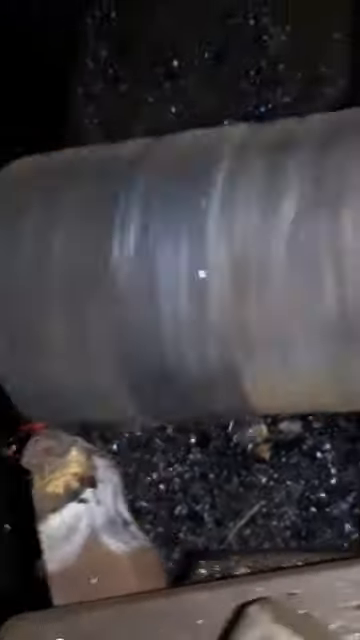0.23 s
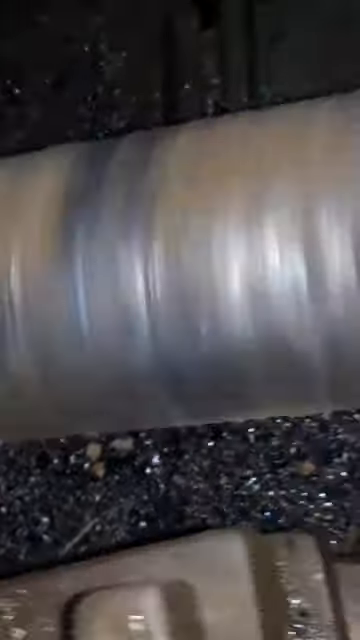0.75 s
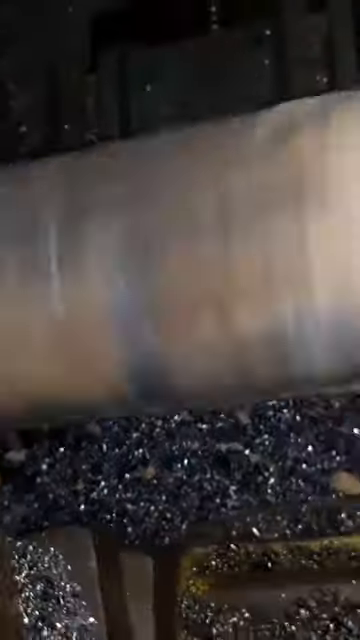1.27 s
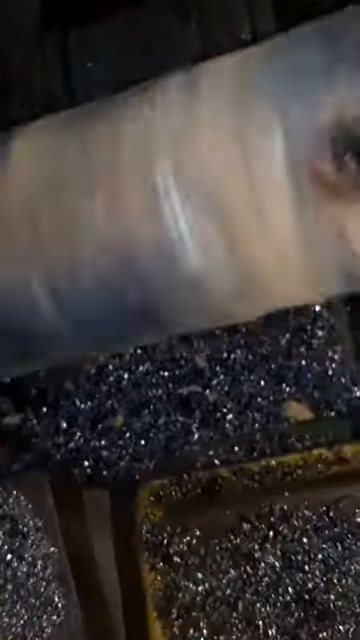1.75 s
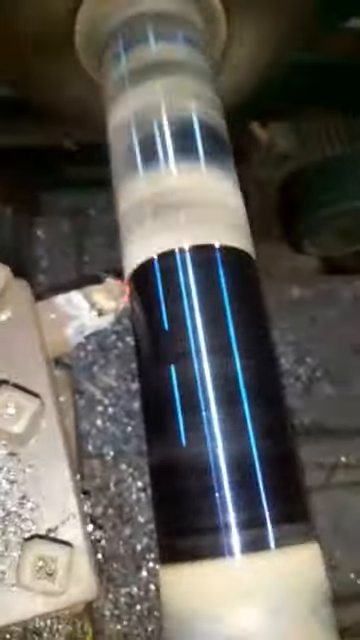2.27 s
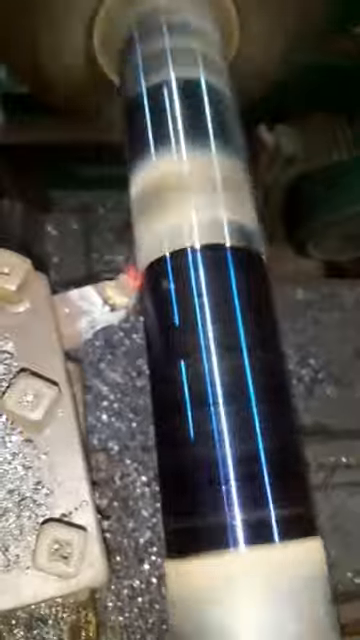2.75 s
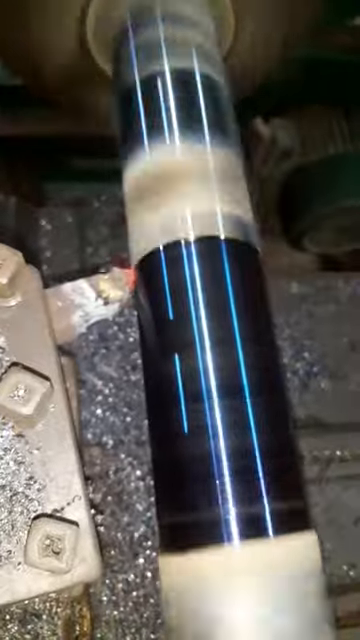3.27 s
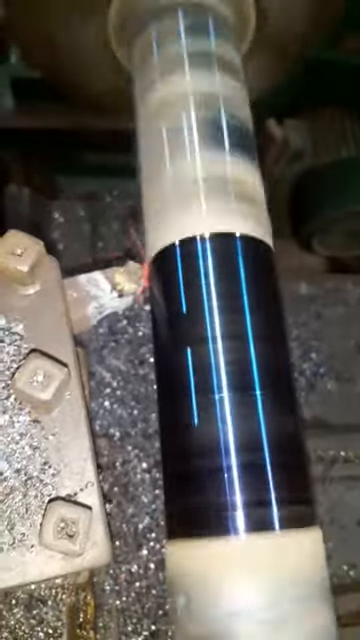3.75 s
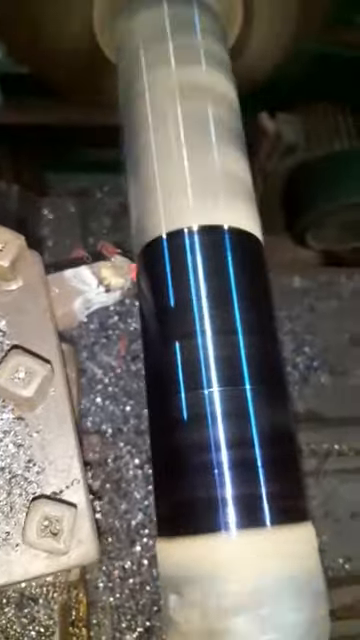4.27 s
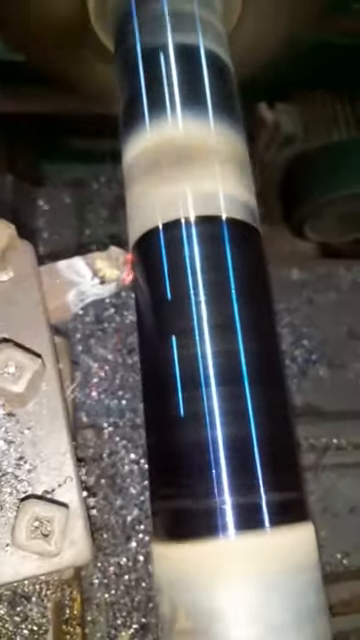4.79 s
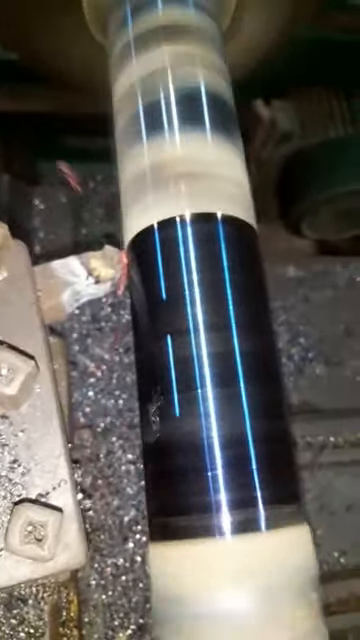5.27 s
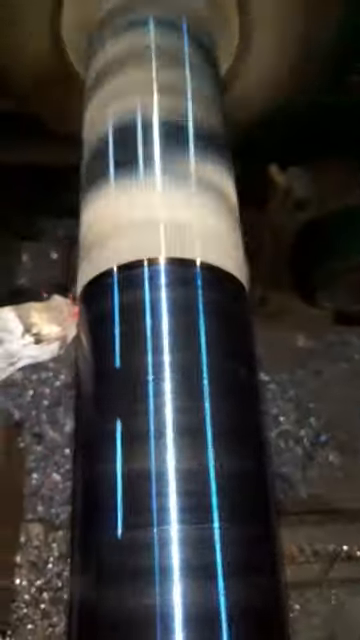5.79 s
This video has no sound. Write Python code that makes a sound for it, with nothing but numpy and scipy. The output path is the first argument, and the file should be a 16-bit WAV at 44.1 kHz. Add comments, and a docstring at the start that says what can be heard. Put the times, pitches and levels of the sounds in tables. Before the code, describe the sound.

A metal lathe rumbles and whirrs while its tool bites into steel, making a piercing, fluttering squeal close to the microphone, mostly on the right. The squeal eases, flares up and stops dead for a moment. It returns over a humming motor and builds to harder, slightly lower squeaks. Throughout, the metal being cut off rasps, hisses and ticks, with very little workshop echo.

```python
"""A lathe cutting steel

Friction makes the tool ring, and it bites into the turning shaft in short, lower squeaks. The chip (the
strip of metal being cut off) crackles, rasps, hisses and snaps. Gears and bearings rumble. An automatic
volume control dips after loud squeaks. The sound pauses, then fades in at a spot where the motor hums."""
import sys
import numpy as np
from scipy import signal
from scipy.fft import rfft, irfft, next_fast_len
from scipy.io import wavfile

SR = 44100
rng = np.random.default_rng(int(sys.argv[2]) if len(sys.argv) > 2 else 0)


def unload_audio(sound):
    """Save the sound as a 16-bit wav file, at the path given as the first command line argument."""
    columns = np.transpose(np.atleast_2d(sound))
    # keep every value between -1 and 1, then stretch to whole-number steps
    steps = np.round(np.clip(columns, -1, 1) * 32767)
    wavfile.write(sys.argv[1], SR, steps.astype(np.int16))


N = 265923
TIME_S = np.arange(N) / SR
PAUSE_S, RESUME_S, FADE_S = 1.926, 2.1003, 0.11

# The tool's hardest bites: time_s, peak_db, half_length_s, pitch_hz, crackle_db
BITES = [(0.0113, -10.5, 0.0031, 2826, -48), (0.022, -14, 0.003, 2830, -46), (0.03, -14, 0.0024, 2800, -47),
         (0.047, -6, 0.0016, 2827, -38), (0.062, -4.5, 0.0048, 2783, -34),
         (0.0875, -9.5, 0.0082, 2830, -40), (0.107, -12, 0.0031, 2813, -42),
         (0.123, -8.5, 0.0084, 2820, -42), (0.137, -9, 0.0014, 2842, -42), (0.157, -21, 0.0041, 2813, -42),
         (0.194, -9.5, 0.0024, 2817, -40), (0.206, -5, 0.0064, 2794, -36), (0.229, -7, 0.0062, 2805, -45),
         (0.2784, -2.5, 0.0052, 2758, -37), (0.3028, -8, 0.0035, 2796, -39), (0.316, -5, 0.0023, 2800, -41),
         (0.3533, -3, 0.0038, 2775, -37), (0.368, -7, 0.0032, 2824, -42), (0.3834, -6.5, 0.0025, 2822, -38),
         (0.395, -9, 0.0016, 2800, -39), (0.4114, -10.5, 0.0072, 2830, -40),
         (0.429, -12, 0.0022, 2841, -37), (0.441, -13, 0.0037, 2831, -37), (0.4583, -14, 0.003, 2816, -45),
         (0.4846, -8.5, 0.0073, 2800, -40), (0.4997, -5.5, 0.0042, 2764, -44),
         (0.523, -11, 0.0048, 2809, -48), (0.567, -5, 0.0057, 2785, -44), (0.597, -10.5, 0.0046, 2808, -51),
         (0.63, -11.5, 0.0051, 2819, -47), (0.644, -6, 0.0041, 2781, -46), (0.666, -28, 0.002, 2852, -40),
         (0.676, -14, 0.0026, 2791, -44), (0.707, -12.5, 0.0058, 2821, -38), (0.728, -18, 0.004, 2846, -33),
         (0.75, -21, 0.0035, 2806, -41), (0.781, -15, 0.003, 2831, -39), (0.859, -20.5, 0.0077, 2805, -40),
         (0.888, -18, 0.0054, 2837, -44), (0.923, -22, 0.0083, 2840, -41), (1, -27, 0.0043, 2842, -42),
         (1.081, -15.5, 0.0029, 2824, -38), (1.092, -21, 0.0032, 2818, -42),
         (1.1483, -14, 0.0085, 2805, -39), (1.171, -22, 0.0034, 2810, -37),
         (1.219, -6.5, 0.0031, 2773, -40), (1.234, -17.5, 0.0017, 2784, -37),
         (1.2465, -14.5, 0.0032, 2761, -42), (1.284, -18.5, 0.0022, 2825, -45),
         (1.297, -23.5, 0.0051, 2833, -42), (1.337, -26, 0.0047, 2861, -48),
         (1.415, -27, 0.0031, 2837, -48), (1.506, -25, 0.0024, 2832, -45), (1.55, -23, 0.0031, 2833, -39),
         (1.581, -6, 0.0024, 2812, -34), (1.606, -18, 0.0039, 2837, -42), (1.619, -13, 0.0022, 2800, -38),
         (1.628, -10, 0.0038, 2831, -45), (1.653, -2, 0.0043, 2747, -40), (1.69, -8, 0.002, 2786, -43),
         (1.719, -1.5, 0.0049, 2748, -40), (1.7355, -14, 0.0019, 2776, -45),
         (1.7522, -5.5, 0.0031, 2777, -42), (1.784, -9, 0.0036, 2772, -46),
         (1.795, -7.5, 0.0051, 2812, -44), (1.819, -5.5, 0.0023, 2786, -38),
         (1.841, -12.5, 0.0036, 2815, -42), (1.864, -9, 0.01, 2815, -39), (1.8974, -13, 0.01, 2815, -45),
         (2.271, -22, 0.0042, 2762, -46), (2.3274, -15, 0.0076, 2740, -44),
         (2.381, -17.0, 0.0066, 2747, -48), (2.397, -14, 0.0067, 2749, -46),
         (2.429, -22, 0.0042, 2729, -42), (2.451, -15.5, 0.005, 2730, -36),
         (2.4634, -14.5, 0.0076, 2728, -42), (2.533, -13.5, 0.0064, 2743, -42),
         (2.596, -13, 0.0054, 2709, -34), (2.6436, -13, 0.002, 2736, -42), (2.67, -16, 0.0046, 2752, -47),
         (2.7229, -13.5, 0.0035, 2766, -37), (2.754, -18, 0.0056, 2752, -37),
         (2.807, -17.0, 0.0052, 2765, -53), (2.8595, -13, 0.0039, 2754, -38),
         (2.979, -20, 0.0035, 2747, -34), (2.997, -9.5, 0.011, 2750, -33), (3.023, -16, 0.0045, 2782, -33),
         (3.056, -17, 0.0049, 2759, -42), (3.0775, -14.5, 0.0049, 2779, -42),
         (3.129, -17, 0.0057, 2755, -29), (3.16, -25, 0.0052, 2773, -42), (3.211, -27, 0.0052, 2769, -42),
         (3.256, -19.5, 0.0048, 2778, -40), (3.28, -22, 0.0041, 2754, -48), (3.336, -22, 0.0064, 2740, -48),
         (3.403, -23, 0.004, 2746, -45), (3.474, -21, 0.0052, 2758, -43), (3.503, -21.5, 0.006, 2754, -42),
         (3.53, -19, 0.0096, 2760, -35), (3.609, -14, 0.0054, 2751, -42), (3.635, -14.5, 0.0054, 2765, -42),
         (3.655, -17, 0.0027, 2773, -30), (3.672, -11, 0.0046, 2745, -38), (3.682, -12, 0.0045, 2745, -34),
         (3.73, -12.5, 0.01, 2750, -41), (3.749, -16, 0.0048, 2764, -44), (3.772, -14, 0.0088, 2755, -40),
         (3.815, -9.5, 0.0054, 2774, -30), (3.846, -8, 0.0052, 2746, -46), (3.864, -11, 0.0045, 2707, -44),
         (3.881, -10, 0.0051, 2748, -44), (3.943, -12.5, 0.0075, 2744, -32),
         (3.998, -7.5, 0.018, 2754, -44), (4.016, -6, 0.0033, 2760, -38), (4.062, -11, 0.0035, 2774, -25),
         (4.0954, -12, 0.005, 2744, -33), (4.122, -5, 0.0072, 2730, -47), (4.151, -7, 0.0079, 2740, -39),
         (4.203, -3.5, 0.0024, 2686, -22.5), (4.222, -8, 0.0074, 2690, -38), (4.235, -3, 0.0043, 2684, -27),
         (4.26, -6, 0.0048, 2697, -44), (4.289, -5, 0.0062, 2733, -29), (4.3405, 1.5, 0.0026, 2639, -23),
         (4.372, -4.5, 0.0053, 2730, -25), (4.4273, -8.5, 0.006, 2750, -36),
         (4.478, -12, 0.0032, 2676, -23.5), (4.492, -7, 0.007, 2690, -43), (4.511, -8, 0.0035, 2748, -31),
         (4.542, -10, 0.0068, 2744, -44), (4.5653, -4, 0.0047, 2726, -32), (4.617, 0.5, 0.0029, 2618, -24),
         (4.649, -4.5, 0.0029, 2650, -24), (4.674, -8, 0.0083, 2720, -42), (4.706, -7.5, 0.016, 2710, -26),
         (4.7547, 1, 0.003, 2606, -20.5), (4.836, -5, 0.0089, 2655, -29), (4.8924, 0.5, 0.0038, 2600, -24),
         (4.9243, -0.5, 0.002, 2650, -22), (4.958, -7, 0.015, 2655, -39), (4.98, -11, 0.0028, 2703, -35),
         (5.0345, -4.5, 0.002, 2643, -26), (5.0665, -11, 0.0029, 2764, -32), (5.103, -2, 0.011, 2640, -38),
         (5.144, -13, 0.0047, 2700, -43), (5.171, -16, 0.0033, 2720, -35), (5.207, -16, 0.0033, 2713, -41),
         (5.241, -8, 0.0097, 2665, -46), (5.264, -12, 0.0075, 2715, -46), (5.281, -14, 0.0065, 2756, -42),
         (5.326, -14, 0.0097, 2745, -40), (5.343, -11, 0.0033, 2747, -36), (5.37, -15.5, 0.0072, 2720, -42),
         (5.389, -13, 0.0042, 2715, -40), (5.4234, -16.5, 0.017, 2760, -38),
         (5.48, -16.5, 0.0047, 2756, -33), (5.499, -15.5, 0.0068, 2725, -44),
         (5.572, -16.5, 0.0028, 2765, -42), (5.595, -15, 0.0022, 2682, -31),
         (5.607, -18.5, 0.0032, 2690, -42), (5.6624, -7, 0.0021, 2622, -21),
         (5.683, -12, 0.0023, 2707, -42), (5.704, -18, 0.0044, 2698, -42), (5.717, -17, 0.0032, 2670, -42),
         (5.734, -5.5, 0.0013, 2633, -26), (5.758, -13, 0.0029, 2640, -28), (5.788, -18, 0.0017, 2660, -42),
         (5.804, -4.5, 0.0015, 2640, -18), (5.817, -13.5, 0.007, 2710, -38), (5.831, -5, 0.0023, 2670, -21),
         (5.9, -7.5, 0.0033, 2726, -25), (5.926, -14, 0.008, 2730, -30), (5.944, -13, 0.0018, 2670, -42),
         (5.953, -14, 0.0035, 2685, -44), (5.9653, -1, 0.0028, 2684, -18.5),
         (5.9848, -8, 0.0074, 2644, -28), (6.002, -5, 0.0035, 2640, -28), (6.0134, -1.5, 0.0016, 2635, -13)]
# How loud the machine is, one list for each listening spot: time_s, rumble_db, gears_db, hiss_db
MACHINE_LEVELS = [
    [(0, -23.5, -25.5, -39.5), (.6, -23.5, -27.5, -41), (1.3, -22, -23.5, -39.5), (1.52, -18, -19.5, -38.5),
     (1.66, -19, -20.5, -35), (1.92, -22, -23, -39.5)],
    [(2.27, -18.5, -18.5, -33.5), (3.55, -21, -19, -34.5), (3.9, -18.5, -18, -32),
     (4.3, -20.5, -20.5, -32.5), (4.6, -25, -24, -34.5), (4.8, -25, -26, -32.5), (4.95, -29, -28.5, -34.5),
     (5.35, -29, -26, -41), (5.5, -31.5, -32, -43), (5.65, -24, -27, -35.5), (5.8, -24, -26, -36.5),
     (5.93, -21.5, -23.5, -37), (6.03, -24, -22, -26)],
]


def amp(db):
    """Turn decibels into a factor to multiply by."""
    return 10 ** (np.asarray(db) / 20)


def rms_one(x):
    """Scale a signal so that its average power is 1."""
    return x / np.sqrt(np.mean(np.abs(x) ** 2) + 1e-20)


def in_time(rows):
    """Join rows of (time_s, values...) with straight lines: one curve for each value column."""
    times_s, *columns = np.transpose(rows)
    return [np.interp(TIME_S, times_s, column) for column in columns]


def at_hz(rows, hz):
    """Read between rows of (pitch_hz, value), with every octave equally wide."""
    pitches_hz, values = np.transpose(rows)
    return np.interp(np.log(hz), np.log(pitches_hz), values)


def by_spot(first, second):
    """One value for the listening spot before the pause, another for the spot after it."""
    return np.where(TIME_S < PAUSE_S, first, second)


def drift(rate_hz):
    """A smooth random wobble of about size 1; a higher rate makes it quicker."""
    step = 20
    pole = np.exp(-2 * np.pi * rate_hz * step / SR)
    slow = signal.lfilter([1], [1, -2 * pole, pole * pole], rng.standard_normal(N // step + 2002))[2000:]
    return np.interp(np.arange(N) / step, np.arange(len(slow)), rms_one(slow))


def waver(rate_hz):
    """A two-part (complex) wobble that shakes both the level and the phase of a tone."""
    return drift(rate_hz) + 1j * drift(rate_hz)


def spin(hz):
    """A steady tone as a point going round a circle; its real part is the sound."""
    return np.exp(2j * np.pi * hz * TIME_S)


def wavering_tone(levels, hz, waver_hz, steady):
    """A tone that follows rows of (time_s, level_db); a larger `steady` makes it waver less."""
    wobble = rms_one(steady + waver(waver_hz))
    return amp(in_time(levels)[0]) * np.real(wobble * spin(hz))


def bump(time_s, half_s, rise=1, fall=1):
    """Sample positions and shape of a short bump; `rise` and `fall` stretch its two sides."""
    at = np.arange(max(round((time_s - .05) * SR), 0), min(round((time_s + .05) * SR), N))
    from_peak = (at / SR - time_s) / max(half_s, .0003)
    stretch = np.where(from_peak < 0, rise, fall)
    return at, np.exp(-.6 * np.abs(from_peak / stretch) ** 1.85)


def shaped_noise(spectrum, flicker_db):
    """Flickering stereo noise of power 1, coloured by rows of (pitch_hz, relative_db)."""
    # How alike the two ears are: pitch_hz, likeness (1 means the same)
    likeness = [(60, 0.95), (180, 0.94), (550, 0.49), (1650, -0.21), (4970, -0.097), (15000, 0.049)]
    # Which ear is louder: pitch_hz, left_minus_right_db
    balance = [(60, 1), (180, 0.5), (550, 1), (1650, -4), (4970, -0.5), (15000, 1)]
    size = next_fast_len(N)
    hz = np.maximum(np.arange(size // 2 + 1) * SR / size, 1)
    common, opposed = rfft(rng.standard_normal((2, size)))
    alike = np.clip(at_hz(likeness, hz), -1, 1)
    sides = np.array([[1], [-1]])
    white = np.sqrt(1 + alike) * common + sides * np.sqrt(1 - alike) * opposed
    in_band = (hz >= spectrum[0][0]) & (hz <= spectrum[-1][0])
    gain = in_band * amp(at_hz(spectrum, hz) + sides * at_hz(balance, hz) / 2)
    noise = irfft(gain * white, size)[:, :N]
    return rms_one(noise * amp(flicker_db * drift(37)))


def bites():
    """Each bite squeaks, takes over from the ring (its grip) and pulls the pitch to its own."""
    # The tool's pitch between bites: time_s, pitch_hz
    resting_pitch = [(0, 2839), (.9, 2841), (1.9, 2811), (2.1, 2756), (4.0, 2757), (4.7, 2736),
                     (4.95, 2698), (5.45, 2750), (5.65, 2686), (6, 2712)]
    takeover_share, scoop_hz = .25, 80
    squeaks = np.zeros(N, complex)
    grip, weight, pull = np.zeros((3, N))
    phases = np.exp(2j * np.pi * rng.random(len(BITES)))
    for (time_s, peak_db, half_s, hz, _), phase in zip(BITES, phases):
        at, shape = bump(time_s - 0.21 * half_s, half_s, rise=0.65, fall=1.25)
        squeaks[at] += amp(peak_db) * shape * phase
        hold = shape / takeover_share
        grip[at] += hold
        weight[at] += hold ** 2
        pull[at] += hold ** 2 * (hz - scoop_hz * (shape - .7))   # lowest at the peak
    resting_hz = in_time(resting_pitch)[0] + by_spot(29.8, 13.5) * drift(38.3)
    jitter_hz = by_spot(17.87, 11.6) * drift(151.4)
    return squeaks, grip, (resting_hz + pull) / (1 + weight) + jitter_hz


def nibbles(ring_db):
    """Many small bites of random strength, louder when the ring is loud."""
    per_s, typical_db, spread_db, typical_half_s = 28, -8.5, 8, 0.0016
    count = round(per_s * N / SR)
    nudges, strengths, lengths = rng.standard_normal((3, count))
    times_s = (np.arange(count) + .5 + 0.19 * nudges).clip(0, count - 1) / per_s
    out = np.zeros(N)
    for time_s, strength, length in zip(times_s, strengths, lengths):
        at, shape = bump(time_s, typical_half_s * np.exp(.4 * length))
        out[at] += amp(ring_db[at] + typical_db + spread_db * strength) * shape
    return out


def tool_swing(ring_db):
    """Friction keeps the tool vibrating and bites take over from it. Gives the swing and its pitch."""
    squeaks, grip, pitch_hz = bites()
    squeaks = squeaks + nibbles(ring_db) / (1 + grip)
    friction = by_spot(0.97, 2.27) + drift(52) + 1j * drift(67)   # a steady part plus a random part
    ring = amp(ring_db) * rms_one(friction) / (1 + grip)
    ripple_db = by_spot(1.4, 1.04) * drift(110)
    cycles = np.cumsum(pitch_hz) / SR
    return (ring + squeaks * amp(ripple_db)) * np.exp(2j * np.pi * cycles), pitch_hz


def tool_tone(swing, pitch_hz):
    """The swing as sound: its overtones grow as it gets wider and fade as the pitch rises."""
    # The tool's overtones: multiple_of_pitch, relative_db
    overtones = [(2, -29), (4, -70), (5, -62.5)]
    fade_above_hz, fade_db_per_hz = by_spot(2800, 2640), 0.5
    strength_db = by_spot(-4, 3) - fade_db_per_hz * np.maximum(pitch_hz - fade_above_hz, 0)
    size, tone = np.abs(swing) + 1e-9, swing.real
    growth = size * (size / 0.39) ** 0.79
    for multiple, db in overtones:
        tone = tone + amp(db + strength_db) * growth * np.real((swing / size) ** round(multiple))
    return tone


def workshop_echo(sound):
    """The walls and the machine bed send back a short echo, a different one to each ear."""
    fade_60db_s, delay_s, echo_db = 0.065, .003, -10
    t = np.arange(int(.3 * SR)) / SR
    tails = rng.standard_normal((2, len(t))) * amp(-60 * t / fade_60db_s) * (t > delay_s)
    tails /= np.sqrt(np.sum(tails ** 2, axis=1, keepdims=True))
    return amp(echo_db) * signal.fftconvolve(sound[None], tails, axes=1)[:, :N]


def chip_tearing(ring_db):
    """Bursts of loudness: the chip tears as each bite builds up, and tiny bits break off at random."""
    longest_half_s, bits_per_s, spread_db = 0.0032, 130, 4
    tears = np.zeros(N)
    for time_s, _, half_s, _, crackle_db in BITES:
        at, shape = bump(time_s - .001, min(half_s, longest_half_s))
        tears[at] += amp(crackle_db) * shape
    breaks = rng.random(N) < bits_per_s / SR
    bit_db = by_spot(-33, -28.5) + 0.68 * ring_db + spread_db * rng.standard_normal(N)
    return tears + np.convolve(breaks * amp(bit_db), np.hanning(140), "same")


def chip_crackle(tears):
    """Each tear of the chip lets out a burst of bright noise."""
    # Colour of the crackle: pitch_hz, relative_db
    spectrum = [(3000, -7), (4300, -2.5), (4800, -3), (5300, -20), (7000, -6.5), (9000, -24), (10500, -13),
                (11500, -26.5), (13000, -3), (15700, -22.5)]
    # Boost or cut of its treble above 9 kHz: time_s, gain_db
    treble_levels = [(0, -4), (1.9, 3), (2.2, 5), (4, -6), (5.5, -8), (5.65, 0.5), (6.03, -7)]
    noise = shaped_noise(spectrum, flicker_db=2.5)
    treble = signal.sosfiltfilt(signal.butter(2, 9000, "high", fs=SR, output="sos"), noise)
    return tears * (noise + (amp(in_time(treble_levels)[0]) - 1) * treble)


def chip_rasp(ring_db):
    """The chip rasps off the cutting edge; at the first spot it swells clearly with the ring."""
    # Colour of the rasp: pitch_hz, relative_db
    spectrum = [(2300, -28.5), (2600, 0.5), (3100, -2.5), (3500, -8.5), (3800, -19), (4100, -27)]
    level_db = by_spot(-20.5, -39) + by_spot(0.38, 0.037) * ring_db
    return amp(level_db) * shaped_noise(spectrum, flicker_db=3.5)


def steel_ringing(tears):
    """Friction and tearing chips keep the higher notes of the tool and its holder ringing."""
    # Those notes: pitch_hz, waver_hz, first_spot_db, second_spot_db
    notes = [(4240, 90, 4.5, -0.5), (4600, 95, -8, -1), (5190, 190, -20, 2.5), (5860, 90, 4.5, -3),
             (6650, 150, -8, -13), (7400, 190, -6, -19)]
    flicker_db, ping_db = 3, -5.5
    ringing = np.zeros((2, N))
    for hz, waver_hz, first_db, second_db in notes:
        wobble = np.stack([waver(waver_hz) for ear in range(2)])
        level_db = by_spot(first_db, second_db) + flicker_db * drift(12.0)
        ringing += amp(level_db) * np.real(wobble * spin(hz))
    hiss_db = in_time(np.vstack(MACHINE_LEVELS))[-1]
    friction_db = hiss_db + by_spot(-23, -4.5)
    return rms_one(ringing) * (amp(friction_db) + amp(ping_db) * tears)


def machine():
    """The machine bed rumbles, gears and bearings whirr, and the chip hisses."""
    # Colours of the three noises, one list for each spot: pitch_hz, relative_db
    rumble = [(12, -44.5), (20, -13.5), (38, -19.5), (87, -4), (130, -5.5), (238, -2.5), (343, -14),
              (500, -12), (650, -15), (1100, -120)], [(12, -62), (20, -39.5), (43, -18), (80, -11.5),
              (134, -5.5), (182, 3), (343, -7.5), (500, -11), (650, -16.5), (1100, -120)]
    gears = [(180, -29), (300, -12.5), (409, -12), (768, -6.5), (1310, -12.5), (1480, -9.5), (1800, -17),
             (2000, -14), (2210, -14.5), (2500, -19.5), (3250, -22.5), (5500, -120)], [(180, -33),
             (300, -14), (420, -16.5), (563, -3), (691, -10.5), (796, -3), (893, -9), (1490, -11),
             (1740, -14.5), (2500, -15.5), (3250, -34), (5500, -120)]
    hiss = [(2240, -26), (3800, 6.5), (4250, 5), (4620, 0), (5990, 3.5), (6580, -0.5), (7400, 0),
            (9000, -13), (10300, -14.5), (11400, -4.5), (14500, -13), (15600, -19)], [(2240, 3.5),
            (3800, 2), (4250, -4.5), (4870, -5.5), (5260, -11), (6820, -1.5), (9100, -21.5), (10200, -14.5),
            (11700, -19), (13800, -5.5), (14600, -22), (15600, -39)]
    out = np.zeros((2, N))
    for spectra, level_db in zip((rumble, gears, hiss), in_time(np.vstack(MACHINE_LEVELS))):
        first, second = [shaped_noise(spectrum, flicker_db=1.0) for spectrum in spectra]
        out += amp(level_db) * by_spot(first, second)
    return out


def drone():
    """A low, wavering drone, heard only at the first spot."""
    # Its loudness: time_s, level_db
    levels = [(0, -29), (.6, -44), (1.2, -27.5), (1.42, -27), (1.55, -23.5), (1.7, -28), (1.92, -23)]
    return wavering_tone(levels, hz=79.35, waver_hz=9.0, steady=1.15) * by_spot(1, 0)


def sharp_ticks():
    """Now and then a sharp, bright tick sounds; most are chips snapping off."""
    # The ticks: time_s, peak_db
    snaps = [(0.797, -26), (0.944, -28), (1.082, -31), (1.301, -33), (1.5887, -29), (1.8121, -24.5),
             (2.716, -29.5), (3.151, -27), (3.922, -22), (3.956, -26), (4.062, -34), (4.094, -33),
             (4.474, -32), (4.507, -28), (4.783, -21), (4.879, -24), (4.922, -30), (5.063, -36),
             (5.305, -36), (5.4435, -33), (5.547, -37)]
    # Their colour: pitch_hz, relative_db
    spectrum = [(3500, -10), (6000, 4.5), (8000, -6), (12000, -17), (15700, -3)]
    bursts = np.zeros(N)
    for time_s, peak_db in snaps:
        at, shape = bump(time_s + 0.0014, half_s=0.0012)
        bursts[at] += amp(peak_db) * shape
    return bursts * shaped_noise(spectrum, flicker_db=2.5)


def low_swell():
    """Two low tones swell briefly together at the first spot."""
    # Loudness of the lower tone: time_s, level_db
    levels = [(1.47, -45), (1.53, -19), (1.575, -18), (1.61, -14), (1.635, -21), (1.66, -45)]
    lower = wavering_tone(levels, hz=184, waver_hz=7.4, steady=2.5)
    upper = wavering_tone(levels, hz=285, waver_hz=11.0, steady=1.2)
    return (lower + amp(-7.5) * upper) * by_spot(1, 0)


def motor():
    """Motor and gears hum at multiples of the motor's turning rate, heard only at the second spot."""
    # The tones of motor and gears: cycles_per_turn
    multiples = [2, 3, 4, 5, 6, 6.48, 8.46, 9.6, 11, 12, 13.83, 16.78, 21.48, 25.35]
    # One row for each of those tones: relative_db, waver_hz
    tones = [(-3.5, 2.54), (-28, 5.1), (5, 2.4), (-2.5, 2.2), (-11, 4.5), (-18, 4.3), (-15.5, 4.6),
             (-15.5, 6), (-10, 8.1), (-3, 3.1), (-13, 3.8), (-19, 20), (-10.5, 9.2), (-17.5, 6.7)]
    # Loudness of the hum: time_s, level_db, fifth_multiple_boost_db, gear_whine_boost_db
    levels = [(2.2, -18, -1, -0.5), (2.7, -19, -4, 0), (3.1, -19, 1.5, -2.5), (3.5, -19, 4.5, -3),
              (3.9, -17.5, 0, -0.5), (4.1, -21, -2.5, -1), (4.3, -22, 2.5, 2), (4.65, -23, -2, -7.5),
              (4.95, -28.5, 5, -6), (5.25, -27, -3, -2), (5.55, -30.5, -6, 1), (5.7, -27, 5, -3),
              (5.93, -21, -2, -7), (6.03, -23, 2, -5)]
    turns_per_s = 47.15
    level_db, fifth_db, whine_db = in_time(levels)
    hum = np.zeros((2, N))
    for multiple, (db, waver_hz) in zip(multiples, tones):
        common = 4.7 + waver(waver_hz)
        apart = waver(waver_hz) * 0.11 * multiple   # higher tones are less alike in the two ears
        pair = np.stack([common + apart, common - apart])
        tone_db = db + fifth_db * (multiple == 5) + whine_db * (multiple > 10)
        hum += amp(tone_db) * np.real(pair * spin(multiple * turns_per_s))
    return amp(level_db) * rms_one(hum) * by_spot(0, 1)


def whistle(swing):
    """A thin, high whistle comes up in the cut near the end and flares when the tool swings wide."""
    # Its loudness before flaring: time_s, level_db
    levels = [(0, -78), (5.45, -66), (5.63, -44), (5.72, -46), (5.83, -44), (5.88, -70), (5.96, -38),
              (6.03, -46)]
    pair = np.stack([wavering_tone(levels, hz=10500, waver_hz=130, steady=0.24) for ear in range(2)])
    return pair * (.5 + 5.7 * np.abs(swing))


def scene():
    """The squealing tool and its chip, over the low sounds of the machine."""
    # The tool's ring, one list for each spot: time_s, level_db, left_minus_right_db, left_lead_radians
    ring = [
        [(0, -16.5, -12, 2.2), (.55, -19, -11.5, 2.25), (.7, -22, -11, 1.95), (.9, -23.5, -10, 1.83),
         (1.05, -28, -5, 1.5), (1.2, -23.5, -3, 0.98), (1.45, -42, -5, 1.2), (1.55, -35, 1, 1.13),
         (1.62, -10.5, 8, 1.39), (1.92, -19, 0, 1.33)],
        [(2.2, -27.5, -16, 1), (2.4, -27, -25, 2), (2.6, -22, -25, 4), (3.05, -28.5, -18, 1),
         (3.4, -34, -27, 1.9), (3.58, -27, -20, 3.5), (3.75, -22, -24, 4), (3.93, -18, -20, 3),
         (4.1, -12.5, -28, 1.2), (4.65, -13.5, -23, 2.8), (4.95, -10.5, -18, 1.7), (5.1, -22, -16, 2.7),
         (5.3, -23.5, -21, 2.13), (5.5, -19.5, -23, 3), (5.64, -23, -5, 1.2), (5.82, -20, -6.5, -0.3),
         (5.868, -30, -6.5, -0.26), (5.9, -20, -5, -0.5), (6.03, -18, -14, -1.5)],
    ]
    # The cut deepens twice in each turn of the shaft, so the ring throbs: time_s, throbs_so_far
    throb_count = [(0, -.85), (1.92, 25.8), (2.33, 32), (4.062, 58), (6.03, 86.2)]
    # How strongly it throbs: time_s, depth_db
    throb_depth = [(0, 1.5), (1.9, 2), (2.2, -0.5), (3.6, 3), (4.1, 1), (5.1, 1), (5.3, 1), (6.03, 2.5)]
    ring_db, pan_db, left_lead = in_time(np.vstack(ring))
    ring_db = ring_db + in_time(throb_depth)[0] * np.cos(2 * np.pi * in_time(throb_count)[0])
    swing, pitch_hz = tool_swing(ring_db)
    left = tool_tone(swing * np.exp(1j * left_lead), pitch_hz)
    right = tool_tone(swing, pitch_hz)
    angle = np.arctan(amp(pan_db))
    ears = np.sqrt(2) * np.array([np.sin(angle), np.cos(angle)])   # the total power stays the same
    squeal = np.stack([left, right]) * ears + workshop_echo(right)
    tears = chip_tearing(ring_db)
    scrape = chip_crackle(tears) + chip_rasp(ring_db) + steel_ringing(tears) + sharp_ticks()
    scrape = scrape * ears ** 0.12   # leans only slightly to the squeal's side
    return squeal + scrape + machine() + drone() + low_swell() + motor() + whistle(swing)


def volume_control(x):
    """Loud peaks pull the volume down quickly; it creeps back at a steady rate."""
    threshold_db, cut_share, attack_s, release_db_per_s = -2, 0.71, 0.00089, 52.5
    peak_db = 20 * np.log10(np.abs(x).max(axis=0) + 1e-9)
    over_db = np.maximum(peak_db - threshold_db, 0)
    creep_db = release_db_per_s * TIME_S
    held_db = np.maximum.accumulate(over_db + creep_db) - creep_db
    pole = np.exp(-1 / (attack_s * SR))
    return x * amp(-cut_share * signal.lfilter([1 - pole], [1, -pole], held_db))


def record(dry):
    """Tame the peaks, stop dead at the pause, fade back in, and trim the deepest bass and top treble."""
    ceiling, low_cut_hz, high_cut_hz = .95, 20, 15735
    x = volume_control(dry)
    outline = np.abs(signal.hilbert(x, next_fast_len(N))[:, :N])
    x = x / (1 + (outline / ceiling) ** 6) ** (1 / 6)   # a smooth limit on the loudest peaks
    fade_in = np.clip((TIME_S - RESUME_S) / FADE_S, 0, 1) ** 1.2
    x = x * by_spot(1, fade_in)
    x = signal.sosfilt(signal.butter(2, low_cut_hz, "high", fs=SR, output="sos"), x)
    return signal.sosfilt(signal.cheby2(30, 60, high_cut_hz, fs=SR, output="sos"), x)


dry = scene()
out = record(dry)
unload_audio(out)
```